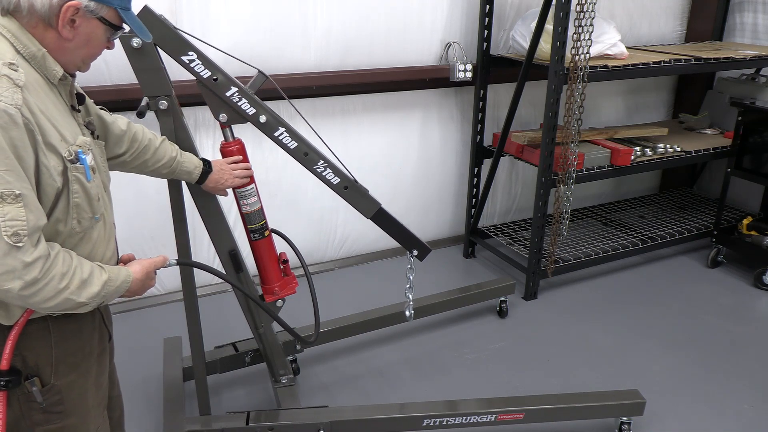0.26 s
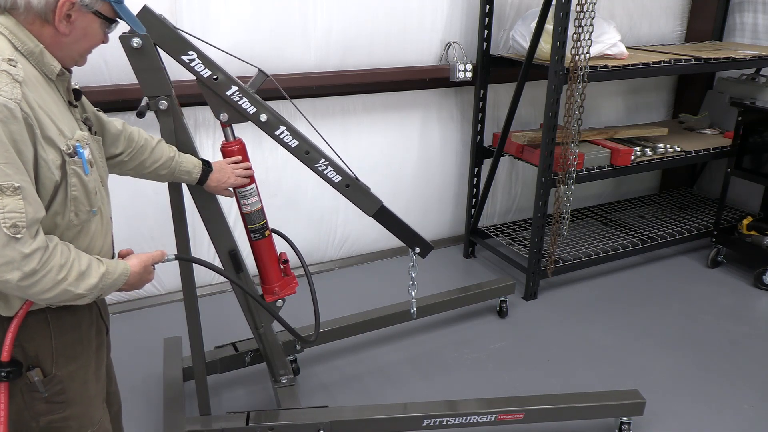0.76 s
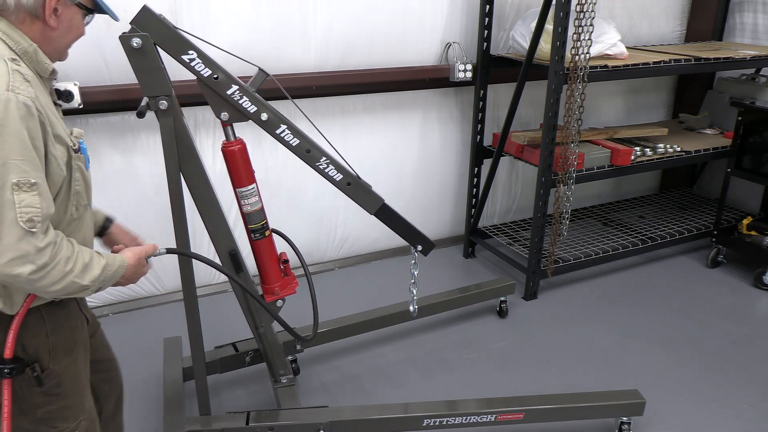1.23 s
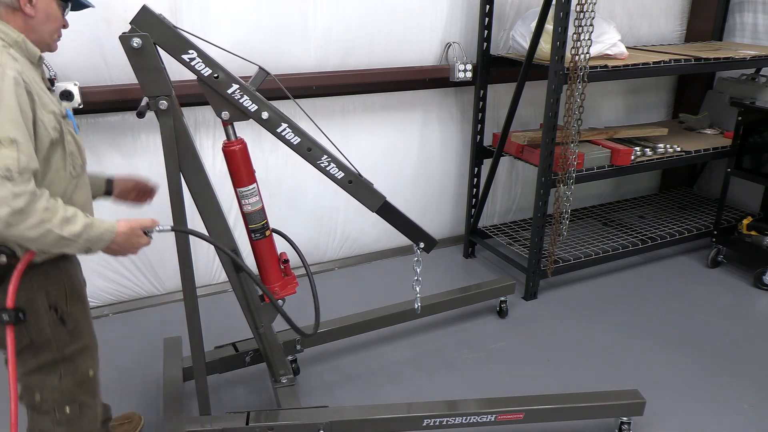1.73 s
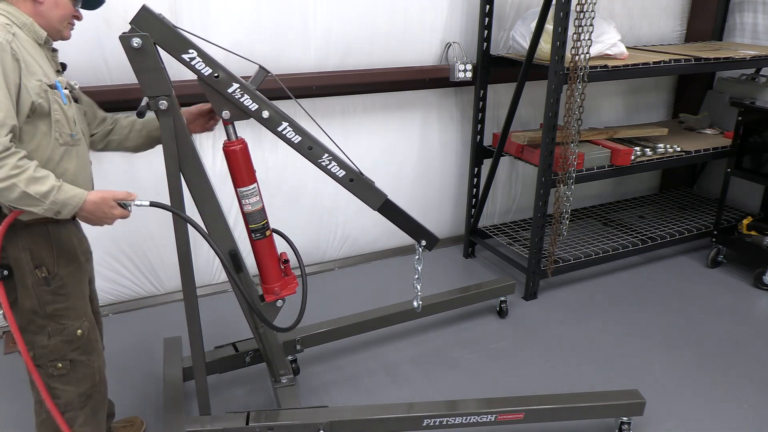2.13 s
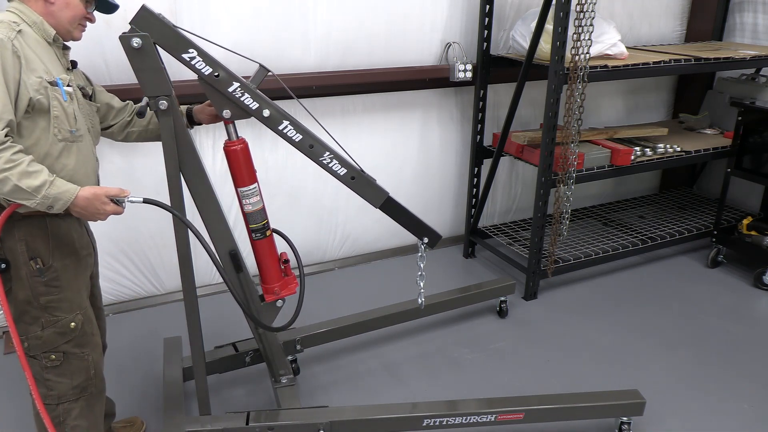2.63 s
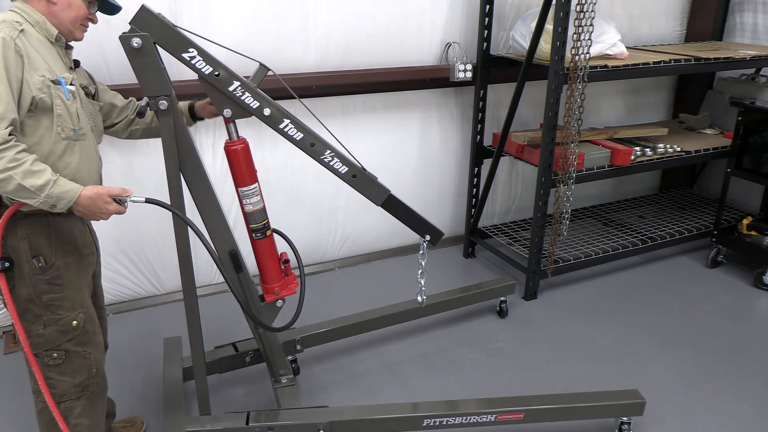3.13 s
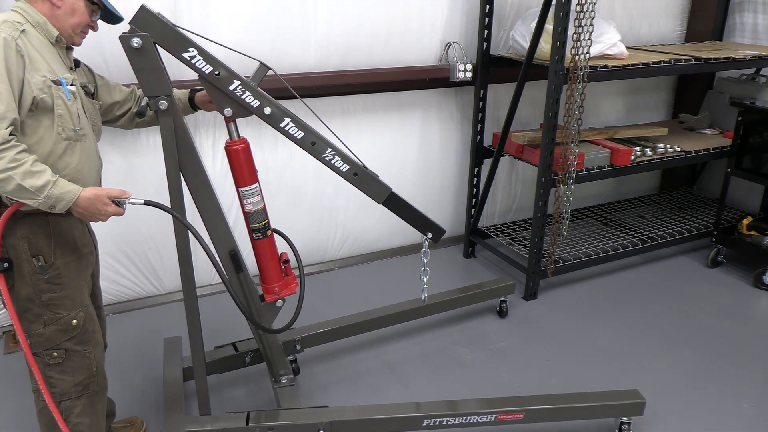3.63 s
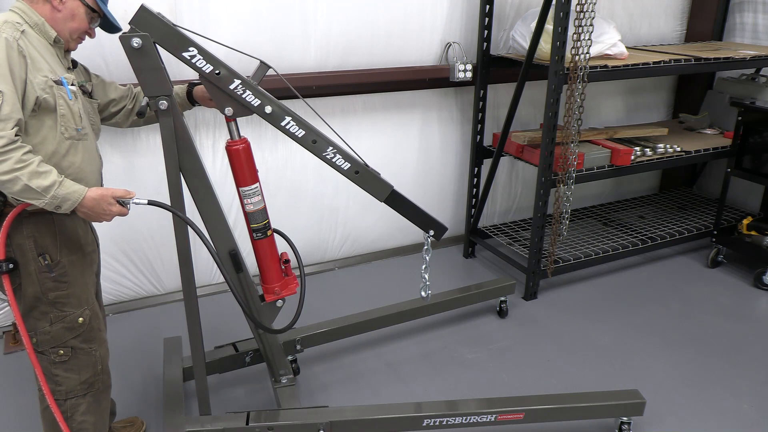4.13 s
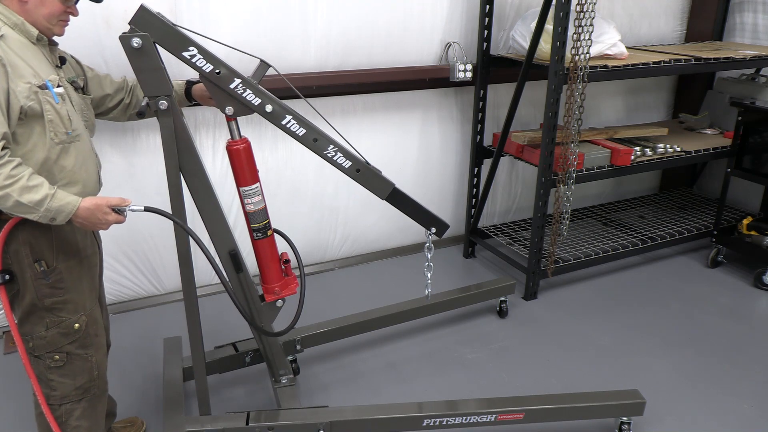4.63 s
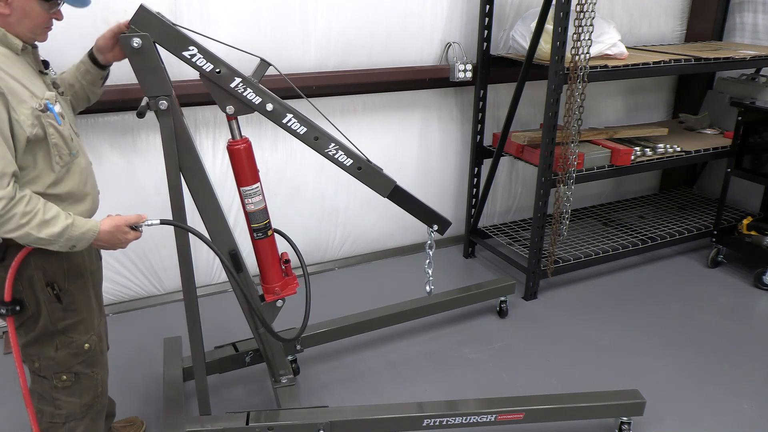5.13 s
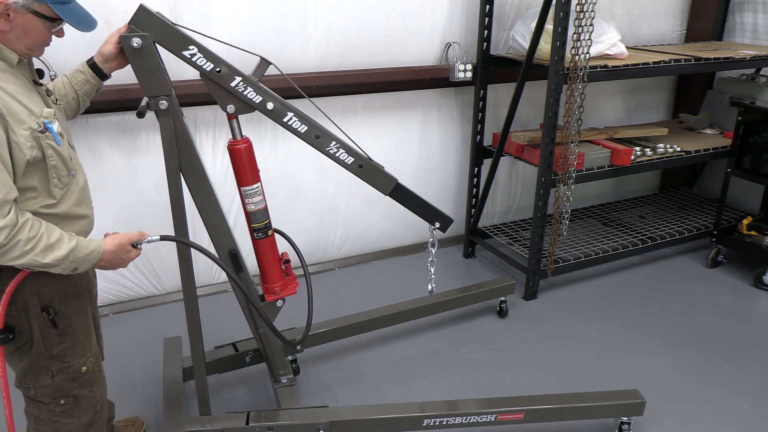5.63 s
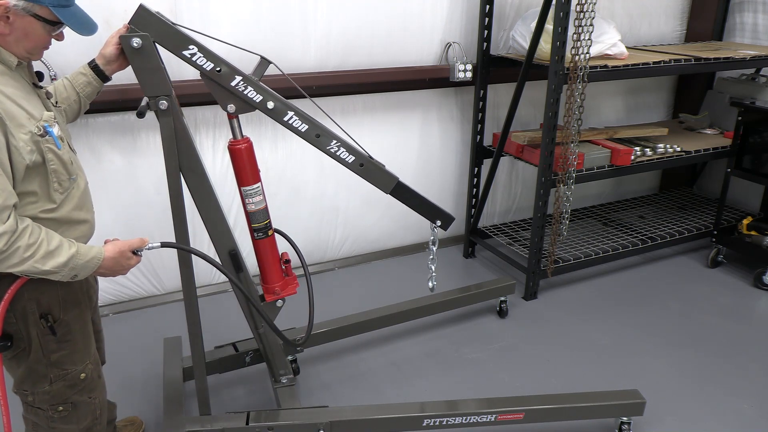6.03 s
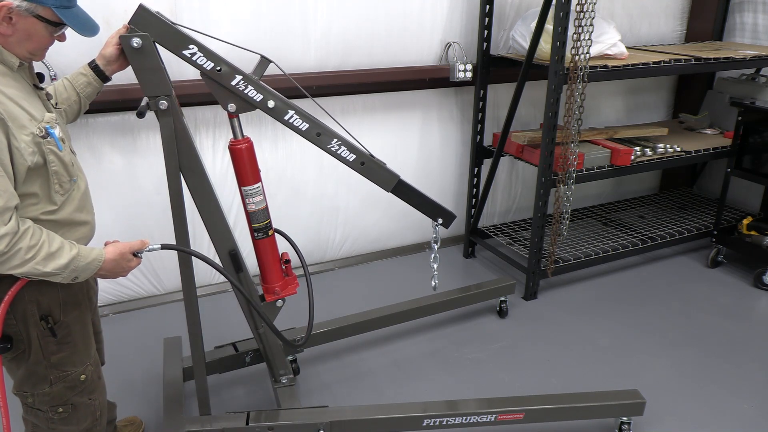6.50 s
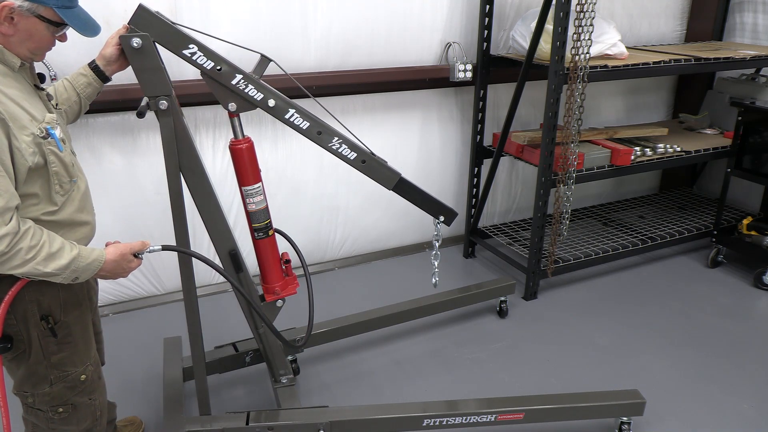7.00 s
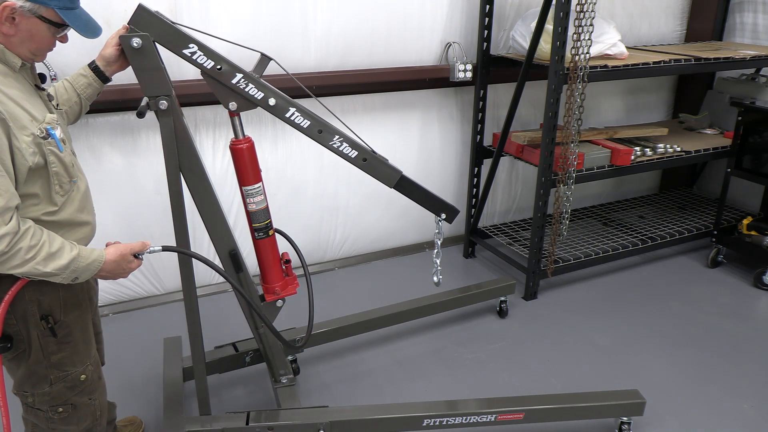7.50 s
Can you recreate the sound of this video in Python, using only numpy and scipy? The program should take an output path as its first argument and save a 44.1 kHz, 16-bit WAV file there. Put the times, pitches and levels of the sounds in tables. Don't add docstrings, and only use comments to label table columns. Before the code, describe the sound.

A fast, buzzing chatter of compressed-air bursts and rattling metal: sharp early clanks, then steady knocking hiss that brightens and softens again in a bare shop.

```python
import sys
import numpy as np
from scipy import signal
from scipy.fft import rfft, irfft
from scipy.io import wavfile
from scipy.ndimage import map_coordinates

SR = 44100
rng = np.random.default_rng(int(sys.argv[2]) if len(sys.argv) > 2 else 0)


def int16_out(signal):
    q = np.round(np.clip(np.atleast_2d(signal).T, -1, 1) * 32767)
    wavfile.write(sys.argv[1], SR, q.astype(np.int16))


N = 342216

STROKES_PER_S, FIRST_PUFF_S = 20.2555, -.0018
RING_DB = -34.5


def undb(db):
    return 10 ** (np.asarray(db) / 20)


def rms_one(x):
    return x / np.sqrt(np.mean(x ** 2) + 1e-20)


def in_time(rows):
    s, *columns = np.transpose(rows)
    return [np.interp(np.arange(N) / SR, s, c) for c in columns]


def at_hz(points, hz):
    f, value = np.transpose(points)
    return np.interp(np.log(hz + 1), np.log(f), value)


def band(x, low_hz, high_hz):
    return signal.sosfilt(signal.butter(4, [low_hz, high_hz], "band", fs=SR, output="sos"), x)


def coloured_noise(spectrum):
    level_db = at_hz(spectrum, np.fft.rfftfreq(N, 1 / SR))
    return rms_one(irfft(rfft(rng.standard_normal(N)) * undb(level_db), N))


# f/Hz, level/dB (per Hz)
JET = [(590, -31), (1000, -26.5), (1240, -23), (1620, -14), (2210, -12.5), (2430, -17.5), (2980, -11),
       (5190, -2), (5560, 1.5), (6020, 2.5), (6450, 2), (8510, 2), (10300, -5), (11700, -5.5),
       (15700, -19.5)]
# low f/Hz, high f/Hz, held t/s, fall/dB per s
PUFF = [
    (880, 2970, 0.023, 305),
    (3230, 5500, 0.018, 358),
    (6050, 9780, 0.017, 470),
    (10000, 14900, 0.016, 572),
]
# t/s, puff lateness t/s
LATENESS = [(0, 0.006), (1.2, 0.0014), (2.3, 0.00025), (5, 0.00051), (7.76, 0.00051)]


def exhaust():
    count = int(N / SR * STROKES_PER_S) + 2
    luck = rng.normal(0, 1, (count, 5))
    opens = FIRST_PUFF_S + np.arange(count) / STROKES_PER_S + 0.0002 * luck[:, 0]
    opens = opens + np.interp(opens, *np.transpose(LATENESS))
    t = np.arange(N) / SR
    stroke = np.clip(np.searchsorted(opens, t) - 1, 0, count - 1)
    age = t - opens[stroke]
    eddies = signal.lfilter([1], [1, -.9], rng.standard_normal(N))
    jet = coloured_noise(JET) * undb(1.9 * rms_one(eddies))
    parts = []
    for k, (low_hz, high_hz, held_s, fall_db) in enumerate(PUFF):
        pressure = undb(-fall_db * np.maximum(age - held_s, 0) + 0.46 * luck[stroke, k + 1])
        pressure = signal.lfilter([.02], [1, -.98], pressure)
        parts.append(rms_one(band(jet, low_hz, high_hz) * pressure))
    return np.array(parts)


# (f/Hz, width f/Hz, level/dB)
POSES = [
    (0, [(7500, 500, 0), (10000, 720, 4.5), (11600, 700, -2), (15400, 1200, 6), (13000, 3800, 6)]),
    (.95, [(7000, 1600, 1), (10000, 900, 0.5), (14000, 2200, 0), (15400, 1200, 3)]),
    (1.8, [(2570, 790, -8.5), (3700, 500, 1), (5770, 250, -3), (6440, 600, -2)]),
    (3.75, [(1830, 710, -6), (4000, 240, 0), (5960, 240, -6), (7540, 240, -3.5), (12900, 1200, 3.5)]),
    (4.45, [(1600, 220, 4.5), (2500, 540, -6.5), (5200, 370, -2.5), (7760, 560, 3), (10300, 500, -3), (15400, 1200, 3)]),
    (5.6, [(2900, 720, -7.5), (5600, 420, -6), (6040, 300, 6.5), (7530, 370, 4.5), (8530, 250, 3.5), (11900, 1000, 3), (1200, 170, -11), (15400, 910, 6)]),
]


def shaded(x, turn_s=0.46):
    hz, t, out = np.fft.rfftfreq(N, 1 / SR), np.arange(N) / SR, x
    spectrum = rfft(x)
    for start_s, humps in POSES:
        shade_db = sum(db / (1 + (2 * (hz - f) / width) ** 2) for f, width, db in humps)
        posed = irfft(spectrum * undb(shade_db), N)
        blend = np.clip((t - start_s) / turn_s + .5, 0, 1) if start_s else 1
        out = out + blend * (posed - out)
    return out


# t/s, deepest notch f/Hz, strength (0-1)
BODY_ECHO = [(0, 8650, 0.2), (1, 9200, 0.3), (1.7, 7840, .23), (2.0, 7500, 0.3), (2.5, 8280, .6),
             (3.3, 8480, .52), (3.5, 8900, 0.4), (3.65, 10000, 0.1), (3.9, 10400, 0.16), (4.25, 10700, 0),
             (4.4, 9200, .4), (4.55, 8020, 0.54), (4.8, 8400, 0.4), (5.0, 7640, 0.3), (5.5, 9300, .4),
             (6, 8650, 0.1), (7.76, 7750, 0.14)]


def body_echo(x, turns=2.97, centre_hz=8300, width_hz=4000):
    notch_hz, strength = in_time(BODY_ECHO)
    hz = np.fft.rfftfreq(N, 1 / SR)
    mirror = np.exp(2j * np.pi * turns - ((hz - centre_hz) / width_hz) ** 2)
    late_at = np.arange(N) - turns * SR / notch_hz
    late = map_coordinates(irfft(rfft(x) * mirror, N), [late_at], order=3)
    return x - np.clip(strength, 0, .95) * late


# f/Hz, t/s
SHOP_T60 = [(200, 1), (2000, 0.82), (8000, 0.87), (15000, 1)]


def shop(x, stay_s=.6):
    t, hop, out = np.arange(SR // 2) / SR, int(stay_s * SR), np.zeros(2 * N)
    octaves = 150 * 2.0 ** np.arange(7)
    bands = np.array([band(rng.standard_normal(N + SR), hz, 2 * hz) for hz in octaves])
    dying = undb(-60 * t / at_hz(SHOP_T60, np.sqrt(2) * octaves)[:, None])
    dying = dying * np.clip((t - .004) / 0.0048, 0, 1)
    padded = np.concatenate([np.zeros(hop), x, np.zeros(2 * hop)])
    for start in range(0, N + hop, hop):
        tail = np.sum(bands[:, start // 2:start // 2 + len(t)] * dying, axis=0)
        piece = padded[start:start + 2 * hop] * signal.windows.hann(2 * hop, sym=False)
        wet = signal.fftconvolve(piece, tail / np.sqrt(np.sum(tail ** 2)))
        out[start:start + len(wet)] += wet
    return out[hop:hop + N]


# f/Hz, level/dB (per Hz)
ROOM_TONE = [(12, -25), (20, 4), (91, -7), (177, -7), (271, -6), (314, -4), (432, -8), (480, -5.5),
             (620, -32), (1060, -120)]


def room_tone():
    return undb(-51.5) * coloured_noise(ROOM_TONE)


def clatter(times, levels_db, spectrum, rebounds, crack_s, tail_s, tail_db, sameness):
    blows = np.zeros(N + SR)
    for late_s, db in [(0.0012, 0)] + rebounds:
        blows[((times + late_s) * SR).astype(int)] = undb(levels_db + db)
    t = np.arange(SR // 4) / SR
    dying = undb(-60 * t / crack_s) + undb(tail_db - 60 * t / tail_s)
    noise = coloured_noise(spectrum)
    alike = signal.fftconvolve(blows, dying * noise[-len(t):])[:N]
    fresh = signal.fftconvolve(blows, dying)[:N] * noise
    return band(np.sqrt(sameness) * alike + np.sqrt(1 - sameness) * fresh, 960, 9000)


# t/s, peak level/dB
CLANKS = [
    (0.0409, -10.5),
    (0.1395, -11),
    (0.2374, -7),
    (0.3358, -12),
    (0.4334, -10),
    (0.5307, -12),
    (0.6311, -10),
    (0.727, -12),
    (0.823, -14.5),
]
# f/Hz, level/dB (per Hz)
CLANK = [(1300, -20.5), (1900, -3.5), (2500, -6), (3100, -5.5), (3700, 0.5), (4200, -7), (4900, 1),
         (5400, -3), (5800, -11), (7000, -12)]


def clanks():
    clank_s, clank_db = np.transpose(CLANKS)
    return clatter(clank_s + 0.00107, clank_db, CLANK, [(.0045, -16), (.009, -28)],
                   crack_s=.012, tail_s=.2, tail_db=-11, sameness=.3)


# t/s, delay t/s, thud level/dB, pin level/dB
KNOCK_DELAY = [(.85, 0.031, -30, -4.5), (1.5, 0.032, -25, -4), (2.15, 0.03, -16, -7),
               (2.4, 0.029, -26, -14.5), (3.0, .0268, -16, -9.5), (4.2, 0.029, -26, -13.5),
               (4.8, .026, -20.5, -9), (5.3, .023, -22.5, -6), (6.0, .020, -33, -4.5),
               (7.76, 0.018, -29.5, -6)]
# t/s, thud peak level/dB, ring level/dB
HARD_KNOCKS = [(1.708, -21.5, -31), (1.856, -16.5, -31), (1.956, -18, -28.5), (2.152, -17, -28),
               (2.201, -17.5, -33), (2.397, -19.5, -30), (2.445, -16.5, -31.5), (2.643, -15, -33),
               (2.694, -16.5, -32), (2.742, -17, -31), (2.89, -18, -35), (3.037, -18, -30),
               (3.086, -15.5, -29.5), (3.184, -17, -33), (3.285, -18, -33), (3.68, -17.5, -31),
               (3.728, -21, -29), (3.776, -16.5, -27.5), (3.873, -14, -29), (3.926, -15, -30),
               (3.977, -11.5, -29), (4.074, -14.5, -32), (4.122, -13.5, -31), (4.22, -17.5, -34),
               (4.321, -13.5, -32), (4.418, -16, -31), (4.468, -16.5, -30), (4.569, -18, -28.5),
               (4.619, -17.5, -30), (4.863, -14, -28)]
GLANCING = [2.0, 2.3, 2.34, 2.79, 2.99, 3.23, 3.34, 3.38, 3.43, 3.48, 3.83, 4.02, 4.17, 4.27, 4.66, 5.05,
            5.15]


def knocks(facing, jitter_s=.0018, slack_gone_s=.85, limp_db=1.5, limp_until_s=1.6, glancing_db=-5):
    count = int(N / SR * STROKES_PER_S)
    luck = rng.normal(0, 1, (count, 2))
    at_s, delay_s, thud_db, pin_db = np.transpose(KNOCK_DELAY)
    s = FIRST_PUFF_S + np.arange(count) / STROKES_PER_S
    s = s + np.interp(s, at_s, delay_s) + jitter_s * luck[:, 0]
    faced = facing[(s * SR).astype(int)]
    ring_db = RING_DB + 0.6 * faced + 1.0 * luck[:, 1]
    rows = np.transpose([s, np.interp(s, at_s, thud_db), ring_db])
    limp = limp_db * (-1) ** np.arange(count) * (s < limp_until_s)
    rows[:, 1:] += limp[:, None]
    rows[[np.argmin(abs(s - at)) for at in GLANCING], 1:] += glancing_db
    rows[[np.argmin(abs(s - at)) for at, *_ in HARD_KNOCKS]] = HARD_KNOCKS
    slack = [(at, db - 17, db - 20) for at, db in CLANKS]
    knock_s, thud_db, ring_db = np.concatenate([slack, rows[s > slack_gone_s]]).T
    tick_db = np.interp(knock_s, at_s, pin_db) + .4 * (ring_db - RING_DB)
    return knock_s, thud_db, ring_db, tick_db


def ring(clicks, hz, t60):
    r, w = undb(-60 / (t60 * SR)), 2 * np.pi * hz / SR
    return signal.lfilter([0, np.sin(w)], [1, -2 * r * np.cos(w), r * r], clicks + 1e-18)


def strike(times, levels_db, modes, spread_db, bounce_s, bounce_db):
    at, out = (np.asarray(times) * SR).astype(int), np.zeros(N)
    luck_db = spread_db * rng.normal(0, 1, (len(at), 2 * len(modes)))
    for k, (hz, db, t60, polarity) in enumerate(modes):
        clicks = np.zeros(N + SR)
        clicks[at + int(bounce_s * SR)] = undb(levels_db + db + bounce_db + luck_db[:, 2 * k])
        clicks[at] = undb(levels_db + db + luck_db[:, 2 * k + 1])
        out += polarity * ring(clicks[:N], hz, t60)
    return out


# f/Hz, level/dB, time to die by 60 dB t/s, polarity
THUD = [(263, -23, 0.18, 0.75), (321, -18, 0.13, 0.61), (374.6, -14.5, 0.042, -0.74),
        (863, -0.5, 0.016, 0.68), (970, 6, 0.012, 0.86), (1200, -4.5, 0.0095, -1.62),
        (1339, -3.5, 0.056, 0.44)]


def piston_thud(knock_s, thud_db):
    thud = strike(knock_s, thud_db - 7, THUD, spread_db=3.0, bounce_s=0.005845, bounce_db=-12.0)
    return band(thud, 280, 1780)


# f/Hz, level/dB, time to die by 60 dB t/s, polarity
FRAME = [
    (553, -1.5, 0.075, 0.72),
    (607, -2, 0.048, -0.59),
    (668, -8.5, 0.12, -0.2),
    (792.6, -2, 0.073, -0.77),
    (833, -3, 0.11, -0.6),
]


def frame_ring(knock_s, ring_db):
    frame = strike(knock_s, ring_db + 4, FRAME, spread_db=2.5, bounce_s=.015, bounce_db=-9)
    return band(frame, 525, 800)


# f/Hz, level/dB (per Hz)
PIN = [(1300, -20.5), (1650, -10.5), (2100, -12.5), (2470, -0.5), (2850, -3.5), (3500, -5.5), (5000, -7),
       (6500, -24)]
# f/Hz, level/dB, time to die by 60 dB t/s, polarity
PIN_RING = [(2440, -18, .032, 1), (2530, -21, .028, -1)]


def pin_tick(knock_s, tick_db):
    crack = clatter(knock_s, tick_db - 22, PIN, [(.004, -5)],
                    crack_s=0.055, tail_s=0.13, tail_db=-14.5, sameness=0.22)
    return crack + strike(knock_s - .0005, tick_db, PIN_RING, spread_db=2.0, bounce_s=.003, bounce_db=-7)


def steel(facing):
    knock_s, thud_db, ring_db, tick_db = knocks(facing)
    knocking = piston_thud(knock_s, thud_db) + frame_ring(knock_s, ring_db) + pin_tick(knock_s, tick_db)
    return clanks() + knocking


# t/s, jet level/dB, facing the pump (0 away, 1 square on), room share level/dB
FACING = [(0, -23, 0.07, 3), (.8, -21.5, 0, 6.5), (1.25, -20.5, 0.13, -1), (1.5, -19, 0, 4),
          (1.7, -20, 0.06, -3), (2.1, -16.5, 0.85, -7), (2.5, -17, 1, -22), (3.1, -17, 0.92, -10),
          (3.4, -18, 1, -18), (3.8, -17, 0.88, -11), (4.1, -16, 1.2, -25), (4.5, -17.5, 0.98, -11),
          (4.9, -19, 0.74, -10), (5.2, -20, 0.62, -0.5), (5.5, -20.5, 0.65, -3), (5.9, -22, 0, 0),
          (6.7, -21.5, 0.08, -1.5), (7.76, -21.5, 0.04, 0)]


def scene():
    jet_db, facing, room_db = in_time(FACING)
    parts = exhaust()
    low_db, middle_db, top_db = -7 - 8 * facing, -3 - 7 * facing, -4.5 - 4 * facing
    jet = np.sum(parts * undb([low_db, middle_db, 0 * jet_db, top_db]), axis=0)
    all_round = undb([-15.0, -10.5, -2.5, -14]) @ parts
    jet, all_round = shaded(np.array([jet, all_round]))
    air_gain = undb(jet_db) / np.sqrt(1 + undb(2 * room_db))
    metal = steel(facing)
    direct = air_gain * body_echo(jet) + metal
    walls = shop(air_gain * undb(room_db) * all_round + undb(-7) * metal)
    sound = direct + walls + room_tone()
    return np.stack([sound, sound])


def band_limit(x):
    return signal.sosfilt(signal.butter(12, 15810, fs=SR, output="sos"), x)


def record(dry):
    mix = 0.85 * np.tanh(dry / 0.87)
    return band_limit(mix)


dry = scene()
out = record(dry)
int16_out(out)
```